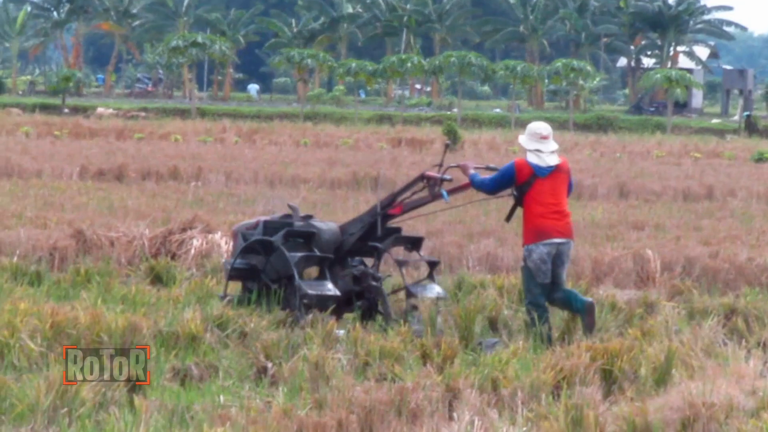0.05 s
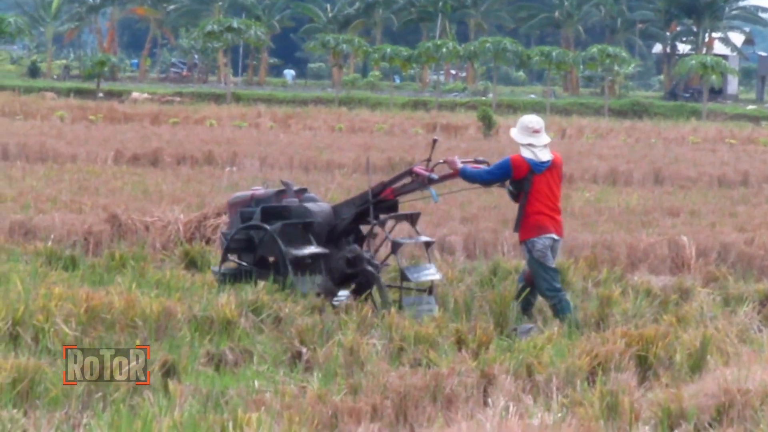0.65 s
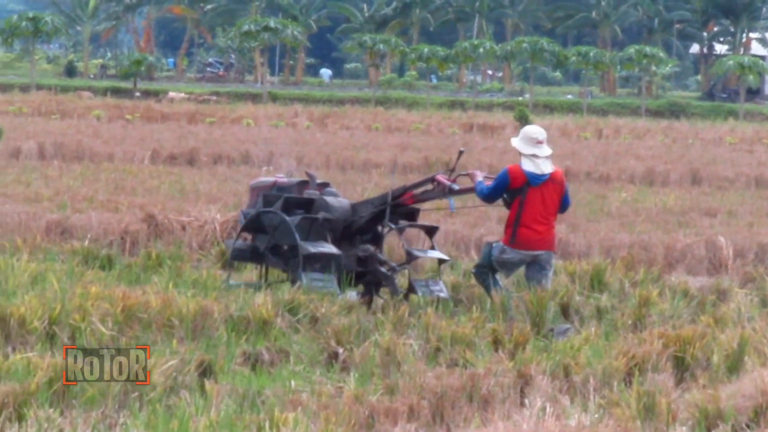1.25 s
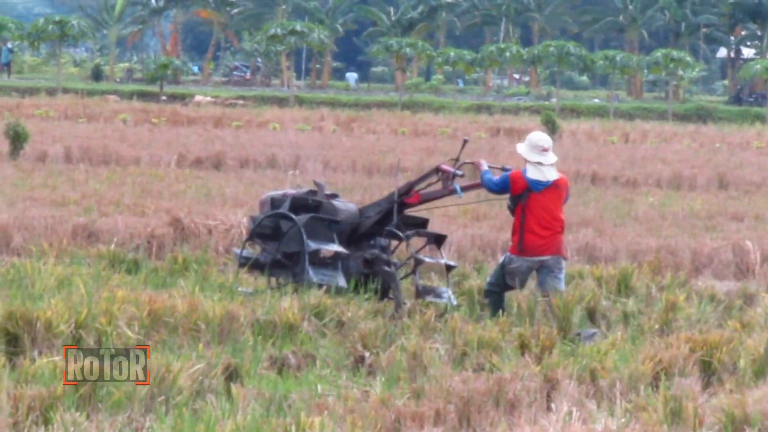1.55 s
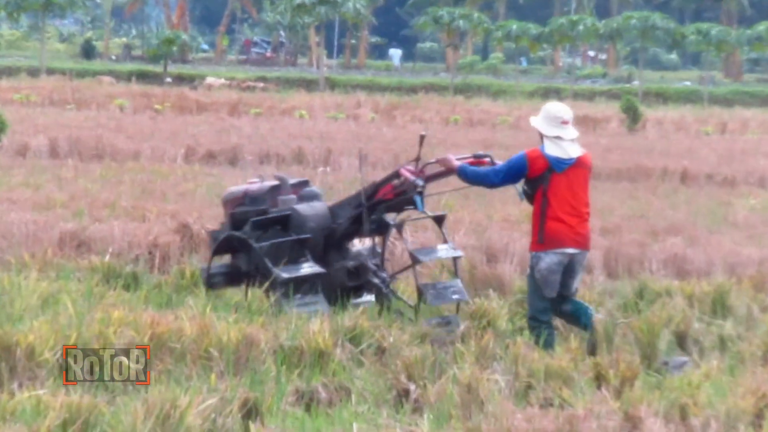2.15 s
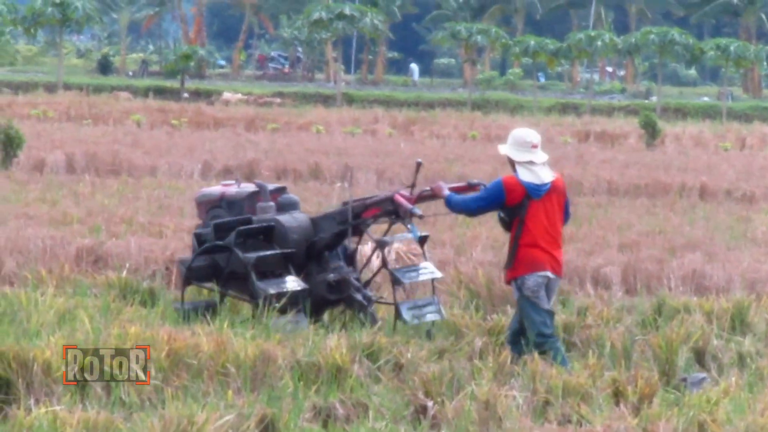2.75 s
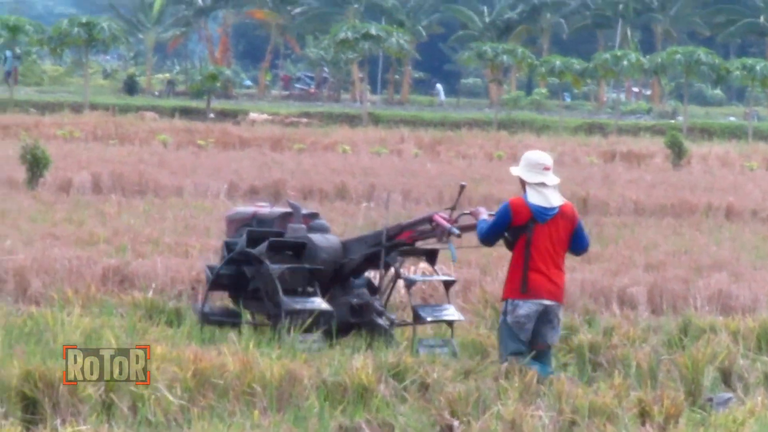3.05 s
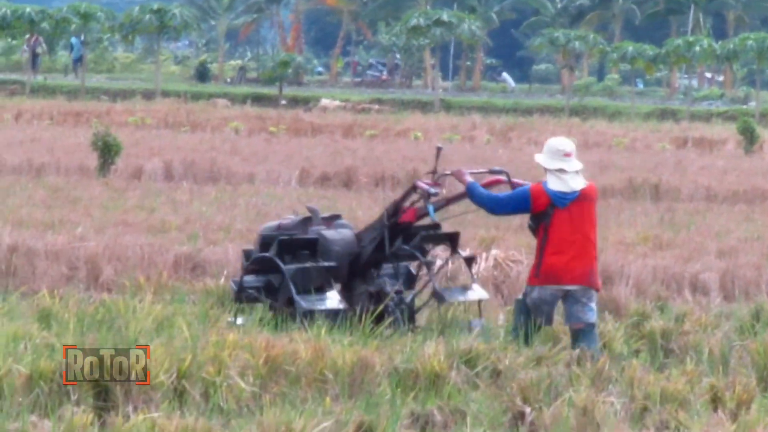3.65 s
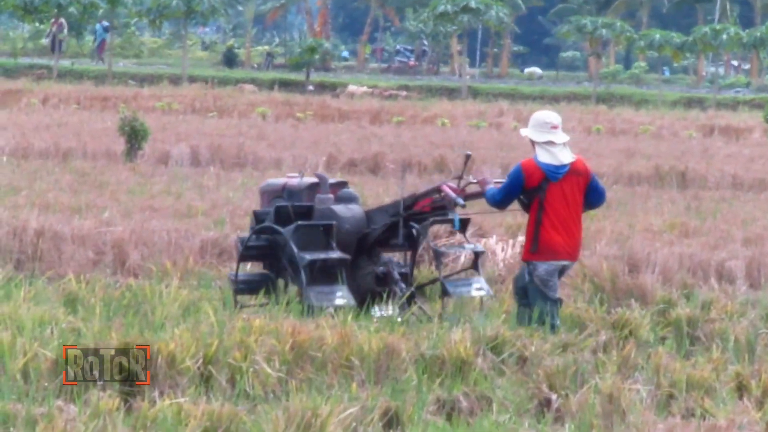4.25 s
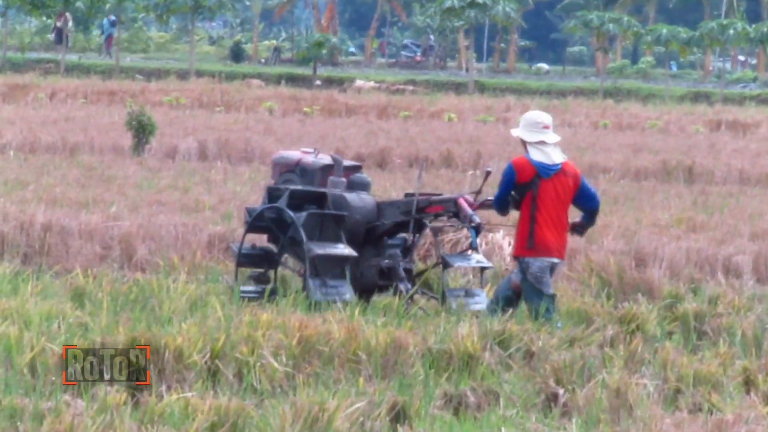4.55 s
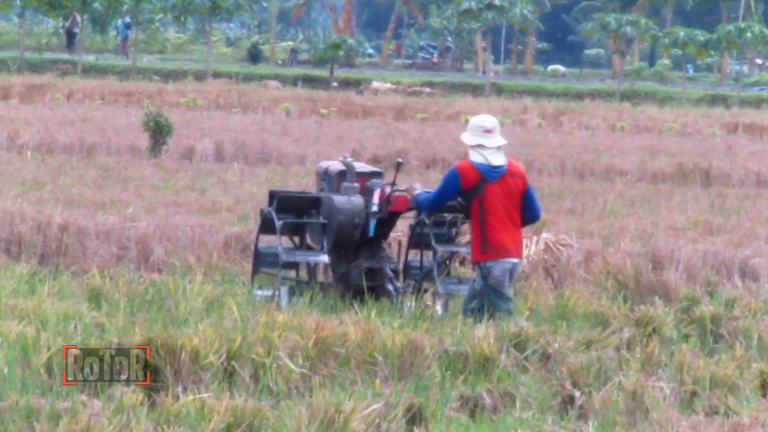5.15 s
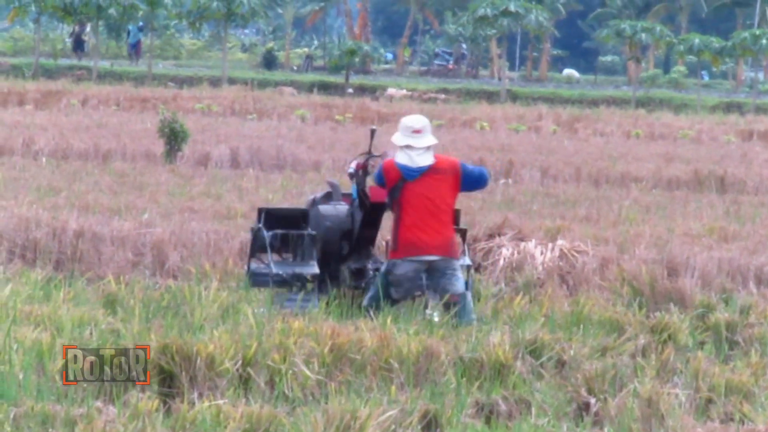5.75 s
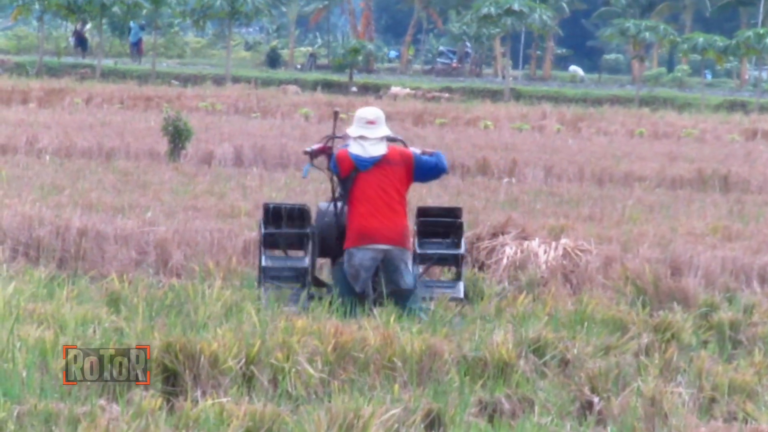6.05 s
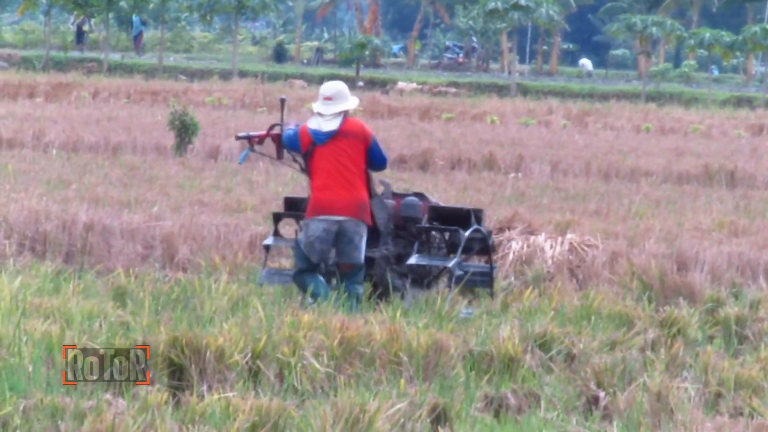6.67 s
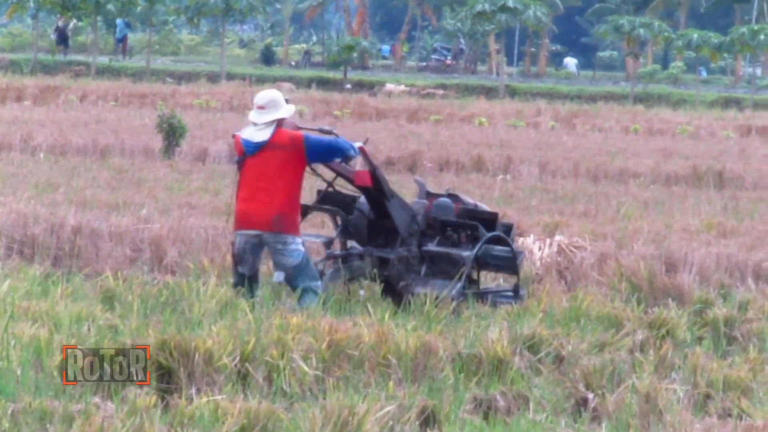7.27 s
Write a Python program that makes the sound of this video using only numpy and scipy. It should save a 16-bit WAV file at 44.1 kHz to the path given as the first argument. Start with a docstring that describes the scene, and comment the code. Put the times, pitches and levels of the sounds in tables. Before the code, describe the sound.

From the start, an engine chugs loudly in an open field, with fast, hollow exhaust puffs that swell to a peak around 1.6 seconds. Under it, the one-cylinder diesel of a walking tractor knocks evenly, about thirteen times a second, with light metal clatter. A loose steel part clinks quickly from 0.8 to 1.4 seconds and again from 3 to 3.8. Near 1.9 seconds the level dips briefly with a click, and the treble stays dull for a moment. The chugging then slows slightly and recedes, sinking into its own echo by about 6 seconds. The tractor's knock is clearest from about 4.8 to 6.3 seconds, then softens toward the end at 7.4. Straw hisses faintly in the breeze over a constant far rumble. Low wind bumps the microphone several times between 5.3 and 6.5 seconds.

```python
"""First you hear an unseen engine chugging loudly, as puffs of exhaust ring its muffler and pipe.
It sinks into its own echo from the tree line, while the slower one-cylinder diesel of a walking
tractor knocks about 13.5 times a second, growing clearer as it turns in a stubble field.
A loose steel part clinks, straw hisses, and low wind bumps the microphone over a far rumble.
Near 1.9 s the level dips briefly with a click, and the treble is dull for a moment afterwards."""
import sys
import numpy as np
from scipy import signal
from scipy.fft import rfft, irfft, next_fast_len
from scipy.io import wavfile
from scipy.ndimage import map_coordinates

SR = 44100
rng = np.random.default_rng(int(sys.argv[2]) if len(sys.argv) > 2 else 0)


def persist_wave(psi):
    """Save psi, clipped to +-1, as 16-bit WAV."""
    counts = np.round(np.clip(psi, -1, 1) * 32767).astype(np.int16)
    wavfile.write(sys.argv[1], SR, np.atleast_2d(counts).T)


N = 326781

# how fast the unseen engine fires: time_s, firings_per_s
CHUG_SPEED = [(0, 25.431), (.25, 25.294), (.7, 25.722), (.95, 25.208), (1.55, 25.138), (3.2, 23.75),
              (3.85, 23.912), (5.75, 23.68), (6.45, 22.387), (7.4, 22.198)]
# how well its exhaust carries to the listener: time_s, level_db
CHUG_LEVEL = [(0, -17), (.4, -12), (1, -7), (1.6, -4.5), (2.1, -9.5), (2.9, -18), (3.8, -19.5), (6, -37.5),
              (7.4, -27)]
# the tones its muffler rings with: pitch_hz, level_db, swell_s
MUFFLER_TONES = [(67, -44, 0.024), (170.5, -4.5, 0.0046), (122.4, -20, 0.0093), (253, -16, 0.0054)]
def unseen_engine():
    """Each puff of exhaust thumps the muffler, rings the pipe and pushes out a rush of gas."""
    chug_db = curve(CHUG_LEVEL)
    puffs = firings(CHUG_SPEED, lead_s=0.0234, jitter_s=0.00028, scatter_db=-0.06)
    # each puff bounces back down the pipe and leaves it a second time
    bounce_samples = int(0.00572 * SR)
    doubled = puffs + 0.74 * np.pad(puffs, (bounce_samples, 0))[:N]
    thump = played(doubled, ring(MUFFLER_TONES, sharpness=4))
    direct = amp(chug_db) * thump + tail_pipe(puffs) + rushing_gas(puffs, chug_db)
    return direct + amp(-36) * tree_line_echo(thump)


# the tail pipe's low and high tones: pitch_hz, level_db, swell_s
LOW_PIPE_TONES = [(282.6, 0.5, 0.01), (378.6, -3, 0.00804)]
HIGH_PIPE_TONES = [(470.3, -0.5, 0.0064), (556, -16.5, 0.00593)]
# how loud each pair is as the engine moves away: time_s, level_db
LOW_PIPE_LEVEL = [(0, -38.5), (.7, -32), (1.4, -43.5), (2.3, -32.5), (3.3, -36.5), (4.4, -48.5), (7.4, -57)]
HIGH_PIPE_LEVEL = [(0, -36), (1.6, -36), (2.9, -41), (3.9, -39.5), (4.5, -46.5), (7.4, -54)]
def tail_pipe(puffs):
    """Puffs of uneven strength make the pipe hum low and ring higher up."""
    uneven = puffs * amp(0.74 * wobble(25))
    hum = amp(curve(LOW_PIPE_LEVEL)) * unit(played(uneven, ring(LOW_PIPE_TONES)))
    ringing = amp(curve(HIGH_PIPE_LEVEL)) * unit(played(uneven, ring(HIGH_PIPE_TONES)))
    return ringing - hum  # the minus turns the hum's wave upside down


# the low bark and the high rasp of swirling exhaust gas: pitch_hz, level_db
BARK_COLOUR = [(300, -5.5), (520, 0), (680, 0), (950, -2), (1200, -4.5), (1800, -49), (4000, -60)]
RASP_COLOUR = [(800, -10), (1100, 0), (1400, 1), (1750, -4.5), (2200, -9), (3000, -15), (8000, -49)]
# how loud the bark is: time_s, level_db
GAS_BARK_LEVEL = [(0, -45), (1, -40), (1.7, -34.5), (2.1, -39), (4.2, -45), (5.2, -49.5), (7.4, -50.5)]
def rushing_gas(puffs, chug_db):
    """The gas flow peaks with each puff and sputters in between."""
    blast = played(puffs, swell(seconds(SR // 20), 0.0044, sharpness=2))
    flow = (1 + 0.5 * blast) * amp(1.65 * wobble(200) + 0.95 * wobble(18))
    bark = amp(curve(GAS_BARK_LEVEL)) * noise(BARK_COLOUR, flow * (1 + 0.29 * blast))
    rasp_db = -36 + 0.38 * chug_db - 5.5 * dullness()  # partly follows the chug
    return bark + amp(rasp_db) * noise(RASP_COLOUR, flow)


# how fast the tractor's diesel fires: time_s, firings_per_s
DIESEL_SPEED = [(0.0, 13.514), (1.0, 13.511), (1.5, 13.479), (2.5, 13.403), (3.2, 13.49), (4.6, 13.489),
                (5.6, 13.581), (6.5, 13.502), (7.4, 13.39)]
# the knock grows as the engine turns towards us, then fades as it turns away: time_s, level_db
KNOCK_LEVEL = [(0, -47.5), (1.8, -49.5), (3.6, -46.5), (4.8, -40.5), (6.3, -41), (7.4, -50)]
# the knock as heard through the engine block: pitch_hz, level_db
KNOCK_COLOUR = [(500, -23), (900, -7), (1400, 0.5), (1750, -12.5), (2300, -9), (2850, 5.5), (3400, -6),
                (4100, -1.5), (4900, -9), (5700, -7.5), (6300, -0.5), (6900, 3.5), (7700, -16),
                (9000, -14.5), (11000, -23.5), (15000, -40)]
# the tones the tractor's silencer rings with: pitch_hz, level_db, swell_s
SILENCER_TONES = [(73, -5, 0.0083), (109, 0, 0.01197), (152, -4, 0.011), (199.9, -3, 0.023),
                  (244, -10.5, 0.022)]
def tractor():
    """Each burn of fuel gives a sharp knock with a short tail; the exhaust adds a soft beat."""
    t, knock_db, dull = seconds(SR // 12), curve(KNOCK_LEVEL), dullness()
    burns = firings(DIESEL_SPEED, lead_s=0.0358, jitter_s=0.00016, scatter_db=1.5)
    blow = swell(t, 0.0048, sharpness=10) + 0.11 * swell(t, 0.013, sharpness=2)
    knock = amp(knock_db - 8 * dull) * noise(KNOCK_COLOUR, played(burns, blow))
    metal = amp(-18.5 * dull) * metal_parts(burns, knock_db)
    puffs = firings(DIESEL_SPEED, lead_s=0.046, jitter_s=0.000067, scatter_db=1.2)
    beat = unit(played(puffs, ring(SILENCER_TONES)))
    beat_db = -35 + 0.47 * (knock_db - knock_db.max())  # partly follows the knock
    return knock + metal + amp(beat_db) * beat


# the tones the iron engine block rings with: pitch_hz, level_db, swell_s
BLOCK_TONES = [(1406, 4.5, 0.0082), (2400, 10, .004), (2850, -4, 0.0024), (3120, -10, 0.003),
               (6400, -6, 0.0037)]
# the tap of the valves and the steady clatter of moving parts: pitch_hz, level_db
VALVE_COLOUR = [(800, -22), (1200, -15), (1430, 5.5), (1750, -15), (2300, -3), (2750, 0.5), (3400, -5),
                (4500, -11.5), (7000, -19), (10000, -34)]
CLATTER_COLOUR = [(700, 1), (1400, -1), (1900, -2.5), (2700, 0.5), (3800, -3), (4800, -7), (6700, -9.5),
                  (8000, -16), (14000, -29)]
# the valves come into the open as the tractor turns: time_s, level_db
VALVE_TAP_LEVEL = [(0, -55), (3, -52), (4.8, -46.5), (7.4, -45.5)]
def metal_parts(burns, knock_db):
    """A valve taps just before each burn; the burn rings the block and shakes up the clatter."""
    t = seconds(SR // 12)
    block = amp(knock_db - 13.5) * unit(played(burns, ring(BLOCK_TONES)))
    taps = firings(DIESEL_SPEED, lead_s=0.0535, jitter_s=0.00022, scatter_db=2.5)
    valves = noise(VALVE_COLOUR, played(taps, swell(t, 0.0062, sharpness=2)))
    shaking = 1 + 0.35 * played(burns, swell(t, 0.0051, sharpness=1))
    clatter = noise(CLATTER_COLOUR, shaking * amp(2.5 * wobble(130)))
    return block + amp(curve(VALVE_TAP_LEVEL)) * valves + amp(-44.3) * clatter


# runs of steel clinks: start_s, end_s, level_db, pitch_hz
CLINK_RUNS = [(.785, 1.391, -32, 3710), (3.043, 3.338, -35.5, 3600), (3.488, 3.779, -31, 3780)]
def steel_clinks(gap_s=0.149, swell_s=0.002):
    """A loose steel part on the tractor clinks in quick, even runs, three short tones per clink."""
    tones = [(1, -3.5), (1.07, -7), (1.5, -8)]  # pitch_ratio, offset_db
    clinks = []
    for start_s, end_s, db, hz in CLINK_RUNS:
        for s in np.linspace(start_s, end_s, round((end_s - start_s) / gap_s) + 1):
            clinks += [(s, db + offset_db, hz * ratio, swell_s) for ratio, offset_db in tones]
    return blips(clinks)


def tree_line_echo(sound, fade_s=0.14, paths=5):
    """Blurred echoes return over several paths that fade in and out with the moving air."""
    t = seconds(SR // 2)
    fade = amp(-60 * t / fade_s)
    echoes = [played(sound, rng.standard_normal(len(t)) * fade) * wobble(6) for _ in range(paths)]
    return unit(sum(echoes))


# the hiss of air and straw, and its finest fizz: pitch_hz, level_db
HISS_COLOUR = [(2000, -6), (6000, -4), (7900, -3), (9300, 2), (11000, 2.5), (12500, -4), (15200, -25)]
FIZZ_COLOUR = [(10000, -12), (12000, 1), (13200, -5), (15200, -6)]
# the breeze slowly drops: time_s, change_db
BREEZE_CHANGE = [(0, 0), (3.6, 1.5), (5.7, -5), (7.4, -8)]
# rustles in the straw: middle_s, boost_db
STRAW_RUSTLES = [(.92, 5), (2.8, 3)]
def straw(rustle_width_s=0.17):
    """The breeze swishes through the straw, which rustles up twice."""
    t = seconds(N)
    rustle_db = sum(db * np.exp(-((t - s) / rustle_width_s) ** 2) for s, db in STRAW_RUSTLES)
    swish = amp(0.33 * wobble(25) + 3.3 * wobble(100))
    hiss = amp(-58 + rustle_db) * noise(HISS_COLOUR, swish)
    fizz = amp(-66 + 3 * dullness()) * noise(FIZZ_COLOUR, swish)
    return amp(curve(BREEZE_CHANGE)) * (hiss + fizz)


# the low rumble over the field: pitch_hz, level_db
RUMBLE_COLOUR = [(15, -27), (30, -20), (50, -10), (90, -2.5), (135, 3), (200, -3.5), (270, -10),
                 (400, -20.5), (700, -33.5)]
# how loud it is: time_s, level_db
FAR_RUMBLE_LEVEL = [(0, -31.5), (2.1, -29), (3.7, -30.5), (5.4, -30), (7.4, -30.5)]
# wind hitting the microphone: start_s, level_db, pitch_hz, swell_s
WIND_BUMPS = [(2.72, -27, 50.3, 0.032), (5.292, -16.5, 130, 0.0093), (5.328, -17.5, 130, 0.0091),
              (5.346, -13.5, 185, 0.0033), (5.79, -14, 238, 0.003), (5.853, -17.5, 149, 0.01),
              (6.325, -19, 60, 0.0075), (6.525, -15, 200, 0.0018)]
def rumble_and_wind():
    """A far rumble goes on while wind bumps the microphone now and then."""
    return amp(curve(FAR_RUMBLE_LEVEL)) * noise(RUMBLE_COLOUR) + blips(WIND_BUMPS)


def dullness(start_s=1.945, rise_s=0.15, hold_s=0.15, fall_s=1.36):
    """How dull the engines' treble is after the dip in level, from 0 (clear) to 1 (dullest)."""
    corners_s = start_s + np.cumsum([0, rise_s, hold_s, fall_s])
    return np.interp(seconds(N), corners_s, [0, 1, 1, 0])


def seconds(samples):
    """The time of each sample."""
    return np.arange(samples) / SR


def amp(db):
    """Turn decibels into a number to multiply by."""
    return 10 ** (np.asarray(db) / 20)


def unit(x):
    """Scale a sound to an average strength (rms) of 1."""
    return x / np.sqrt(np.mean(x ** 2) + 1e-20)


def curve(rows):
    """Join (time_s, value) points with straight lines, one value per sample."""
    return np.interp(seconds(N), *np.transpose(rows))


def wobble(per_s):
    """A smooth curve through per_s random points a second."""
    points = rng.standard_normal(int(N * per_s / SR) + 4)
    at = np.arange(0, N, SR // 2000)
    return np.interp(np.arange(N), at, map_coordinates(points, [at * per_s / SR]))


def filtered(x, gain_at):
    """Turn each pitch in a sound up or down by gain_at(hz)."""
    size = next_fast_len(N + SR // 2)
    return irfft(rfft(x, size) * gain_at(np.fft.rfftfreq(size, 1 / SR)), size)[:N]


def noise(colour, loudness=1):
    """Noise that follows a loudness shape; its colour says how strong each pitch is."""
    pitches, db = np.transpose(colour)
    gain_at = lambda hz: amp(np.interp(np.log(hz + 1), np.log(pitches), db, left=-120, right=-120))
    return unit(filtered(loudness * rng.standard_normal(N), gain_at))


def swell(t, swell_s, sharpness=3):
    """A loudness shape that climbs to 1 in swell_s and dies away."""
    progress = np.maximum(t, 0) / swell_s
    return (progress * np.exp(1 - progress)) ** sharpness


def ring(tones, sharpness=2):
    """Tones that build up and die away, like something hollow or metal being struck."""
    t, sound = seconds(SR // 8), 0
    crest_s = tones[1][2]  # all waves line up when the second tone is loudest
    for hz, db, swell_s in tones:
        shape = swell(t, swell_s, sharpness)
        wave = np.cos(2 * np.pi * hz * (t - crest_s))
        sound = sound + amp(db) * shape * (wave - np.average(wave, weights=shape))  # centred on zero
    return sound


def firings(speed, lead_s, jitter_s, scatter_db):
    """One spike per firing, lead_s early, each a little random in time and size."""
    cycles = np.cumsum(curve(speed)) / SR
    at = np.searchsorted(cycles, np.arange(1, int(cycles[-1]) + 1))
    timing, size = rng.standard_normal((len(at), 2)).T
    at = np.clip(at + SR * (jitter_s * timing - lead_s), 0, N - 1).astype(int)
    return np.bincount(at, amp(scatter_db * size), N)


def played(spikes, shape):
    """Every spike sets off a copy of the shape."""
    return signal.oaconvolve(spikes, shape)[:N]


def blips(rows):
    """Short swelling tones from rows of start_s, level_db, pitch_hz, swell_s."""
    sound, t = np.zeros(N + SR), seconds(SR // 4)
    for start_s, db, hz, swell_s in rows:
        wave = np.cos(2 * np.pi * hz * (t - swell_s))
        sound[int(start_s * SR):][:len(t)] += amp(db) * swell(t, swell_s) * wave
    return sound[:N]


def scene():
    """Both engines in the open field, on one channel."""
    return (tractor() + unseen_engine() + steel_clinks() + straw() + rumble_and_wind())[None]


# the overall volume, steady except for one brief dip: time_s, gain_db
VOLUME = [(1.8815, 4), (1.883, -9.5), (1.95, -5.5), (1.958, 4)]
# clicks around the dip: start_s, level_db, pitch_hz, swell_s
DIP_CLICKS = [(1.8818, -13, 2500, 0.000035), (1.889, -33.5, 2430, 0.0041), (1.9045, -17, 11500, 0.000069),
              (1.9055, -22.5, 2020, 0.0012)]
def record(dry):
    """The level dips once with a few quick clicks, and the very highest treble is cut off."""
    top_hz, fade_hz = 15300, 300
    sound = dry[0] * amp(curve(VOLUME)) + blips(DIP_CLICKS)
    return filtered(sound, lambda hz: np.clip((top_hz - hz) / fade_hz, 0, 1))[None]


dry = scene()
out = record(dry)
persist_wave(out)
```